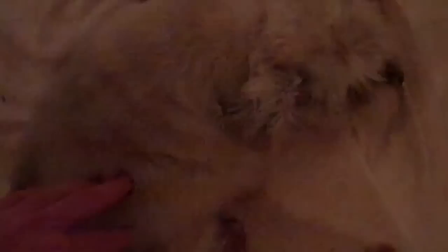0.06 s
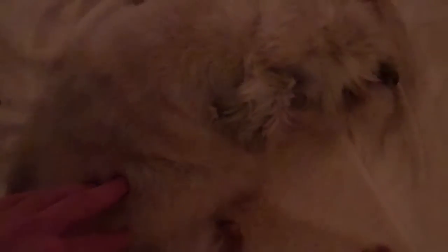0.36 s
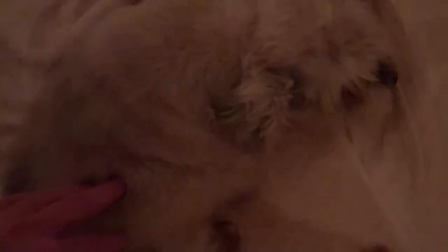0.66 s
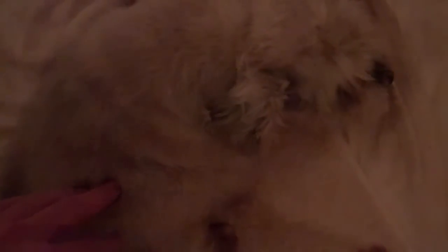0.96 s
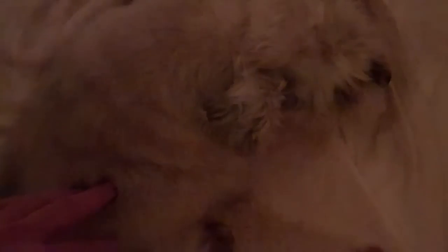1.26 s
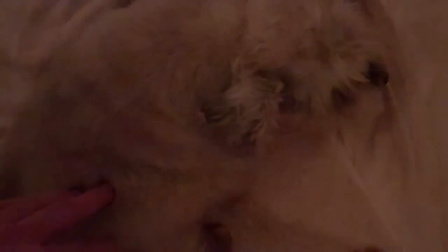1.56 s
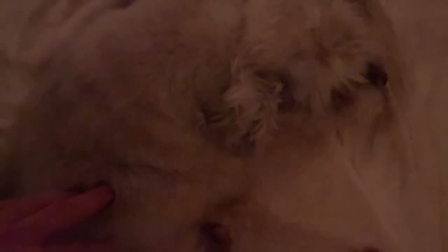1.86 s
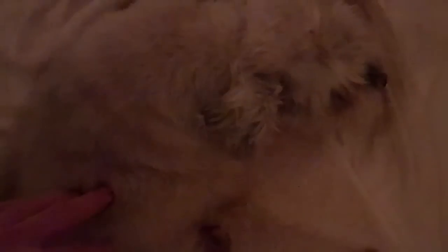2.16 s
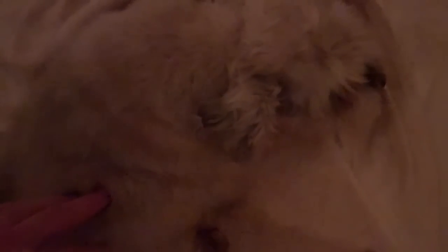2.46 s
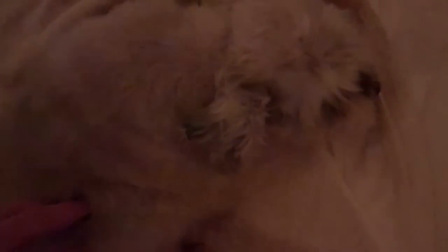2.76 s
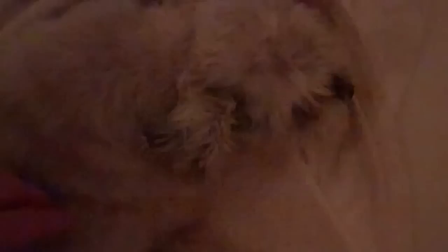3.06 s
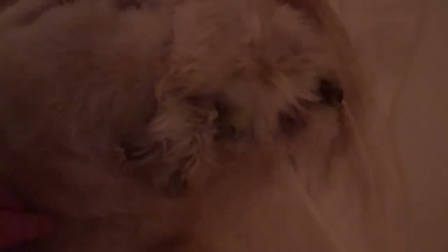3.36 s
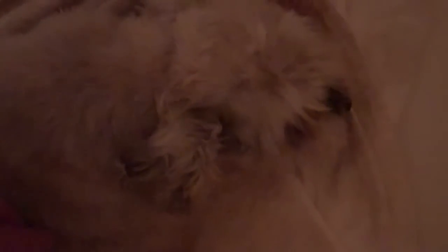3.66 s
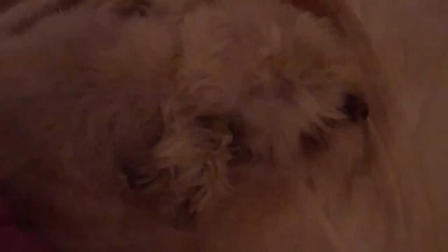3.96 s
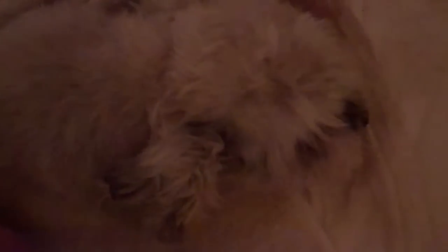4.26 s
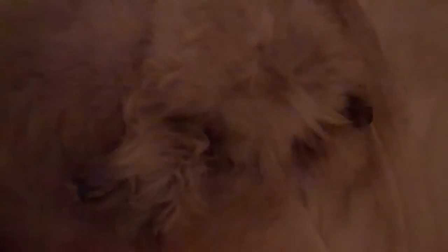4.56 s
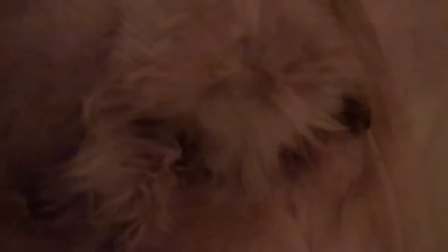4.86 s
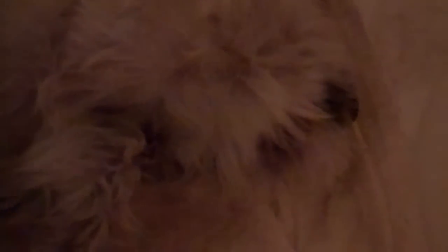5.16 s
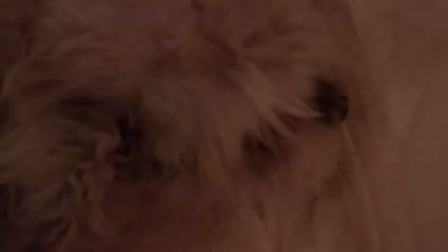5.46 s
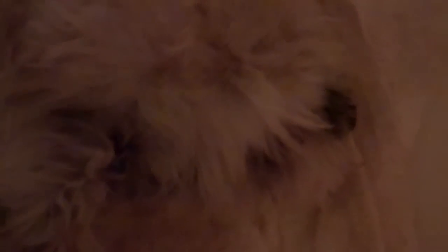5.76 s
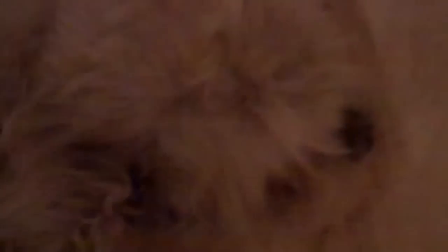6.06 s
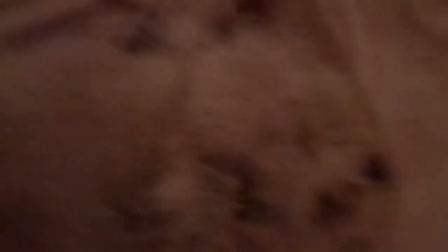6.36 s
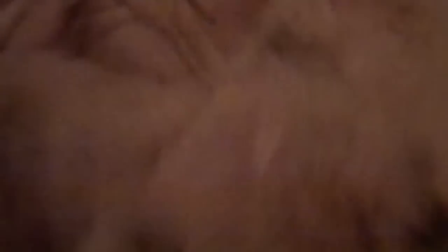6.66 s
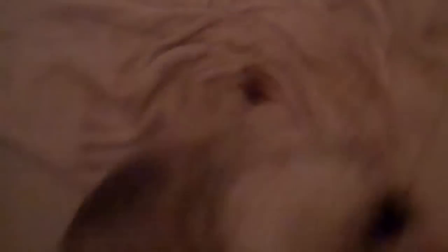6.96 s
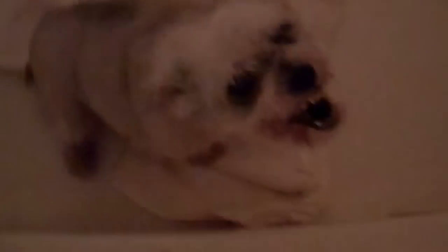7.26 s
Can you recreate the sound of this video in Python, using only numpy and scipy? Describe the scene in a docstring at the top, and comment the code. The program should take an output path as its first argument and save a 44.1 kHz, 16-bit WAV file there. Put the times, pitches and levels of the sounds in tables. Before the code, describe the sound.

A small dog growls close to the microphone in a small, quiet room with faint background hum and hiss. From the start the growl is low, rough and throbbing, made with the mouth shut, with soft wet lip clicks in the first second and a half. It eases around 2 seconds, then grows louder and more open from 3 seconds. Near 4.7 seconds the lips smack and the pitch climbs into a bright, warbling snarl that hisses through the teeth. At 6 seconds the dog snorts in air with a snore-like rattle, ending in a thin, falling nose whistle. At 6.7 seconds comes one long, cracking bark, the loudest sound, wavering in pitch and slightly overloading the microphone for about half a second. The teeth snap at about 7.2 seconds, and a short, raspy breath in follows with one more click.

```python
"""Indoors, in a small furnished room, a stereo microphone close to a small old dog that is being stroked.
It growls with its mouth shut, throat throbbing, lips clicking wetly. Near 3 s the lips part, and by 5 s
the growl has climbed to a toothy snarl. At 6 s it snorts in air, palate rattling, ending in a thin nose
whistle. At 6.7 s one long, cracking bark overloads the microphone; the teeth snap and it rasps in again."""
import sys
import numpy as np
from scipy import signal
from scipy.fft import rfft, irfft, next_fast_len
from scipy.io import wavfile
from scipy.ndimage import uniform_filter1d, map_coordinates

SR = 44100
rng = np.random.default_rng(int(sys.argv[2]) if len(sys.argv) > 2 else 0)


def generate_wav(sig):
    """Save sig (samples, or channels by samples) to the path in sys.argv[1] as 16-bit PCM at SR."""
    pcm = np.round(np.clip(np.atleast_2d(sig).T, -1, 1) * 32767).astype(np.int16)
    wavfile.write(sys.argv[1], SR, pcm)


N = 325899


def amp(db):
    return 10 ** (np.asarray(db) / 20)


def unit(x):
    return x / np.sqrt(np.mean(x ** 2) + 1e-20)


def along(points, hz):
    """Reads (f/Hz, value) points on a log frequency axis."""
    f, v = np.transpose(points)
    return np.interp(np.log(hz + 1), np.log(f + 1), v)


def curves(rows):
    """One value per sample for each column after the time."""
    times, *columns = np.transpose(rows)
    return [np.interp(np.arange(N) / SR, times, column) for column in columns]


def during(rows):
    """1 while a table lasts, with 10 ms fades outside it."""
    t = np.arange(N) / SR
    return np.clip(np.minimum(t - rows[0][0], rows[-1][0] - t) / .01 + 1, 0, 1)


def bumps(rows, half_s):
    """A smooth bump for each (t/s, height) row."""
    t = np.arange(N) / SR
    return sum(height * np.exp(-np.minimum(((t - s) / half_s) ** 2, 20)) for s, height in rows)


def wobble(rate, size=N):
    """A smooth random curve, rate knots a second."""
    knots = rng.standard_normal(int(size * rate / SR) + 4)
    fine = map_coordinates(knots, [np.arange(8 * len(knots)) / 8])
    return np.interp(np.arange(size) * (8 * rate / SR), np.arange(len(fine)), fine)


def phase_of(hz):
    return 2 * np.pi * np.cumsum(hz) / SR


def filtered(x, response):
    """x times a complex response of frequency."""
    size = next_fast_len(N + SR // 4)
    return irfft(rfft(x, size) * response(np.fft.rfftfreq(size, 1 / SR)), size)[..., :N]


def coloured(x, points, size=4096):
    """x through a causal filter with the given (f/Hz, gain/dB) points."""
    cepstrum = irfft(np.log(amp(along(points, np.fft.rfftfreq(size, 1 / SR)))))
    cepstrum[1:size // 2] *= 2
    cepstrum[size // 2 + 1:] = 0
    return signal.oaconvolve(x, irfft(np.exp(rfft(cepstrum))))[:N]


def steady(x, seconds):
    """x with its slow level held at rms 1."""
    size = max(int(seconds * SR), 2)
    power = uniform_filter1d(uniform_filter1d(x * x, size), size)
    return x / np.sqrt(np.abs(power) + 1e-9 * np.mean(x * x))


def resonance(x, centre_hz, width_hz, order=3):
    """A steep resonance whose centre follows a curve."""
    carrier = np.exp(1j * phase_of(centre_hz))
    lowpass = signal.butter(order, width_hz / 2, fs=SR, output="sos")
    return np.real(carrier * signal.sosfilt(lowpass, x / carrier))


# the quiet room: f/Hz, gain/dB
ROOM_TONE = [(25, -33), (60, -4.5), (130, -12), (400, -18), (2500, -19), (14000, -21)]
def room_tone():
    """Steady noise, strongest in the bass, different in each channel."""
    return np.array([unit(coloured(rng.standard_normal(N), ROOM_TONE)) for side in range(2)])


# the fluttering throat: t/s, throb rate/Hz
THROB_RATE = [(0.0, 28.61), (0.6, 25.73), (1.2, 24.18), (1.3, 22.78), (1.4, 25.16), (1.5, 23.1),
              (1.9, 22.74), (2.0, 24.78), (2.1, 21.35), (2.2, 23.51), (2.5, 21.51), (2.8, 22.59),
              (2.9, 25.66), (3.1, 23.25), (3.2, 25.77), (3.4, 21.63), (3.8, 23.38), (4.0, 15.49),
              (4.1, 21.71), (5.0, 22.88), (5.1, 15.72), (5.5, 25.02), (5.6, 22.02), (6.0, 22.97)]
def throbbing(parted, lift_db=0.84, uneven_db=0.78):
    """The throat flutters unevenly; once the lips part, every second throb swells."""
    rate, = curves(THROB_RATE)
    turn = phase_of(rate)
    flutter = np.cos(turn + np.cos(turn) / 2)
    every_second = (1 - np.cos(turn / 2)) ** 2 / 4
    height_db = lift_db * (1 + .5 * wobble(10))
    swell_db = height_db * every_second * parted + uneven_db * wobble(25)
    return flutter, swell_db


def closures(pitch, rough, jitter, shimmer_db, breath):
    """Vibrating tissue shuts once a cycle; roughness scatters the pulses and adds puffs of air."""
    cycles = np.cumsum(pitch) / SR
    at = np.interp(np.arange(1, int(cycles[-1])), cycles, np.arange(N))
    index = at.astype(int)
    late, size = rng.standard_normal((len(at), 2)).T
    at = np.clip(at + late * jitter * rough[index] * SR / pitch[index], 0, N - 2)
    size = amp(size * shimmer_db * rough[index])
    whole, part = at.astype(int), at % 1
    pulses = np.bincount(whole, size * (1 - part), N) + np.bincount(whole + 1, size * part, N)
    puffs = rng.standard_normal(N) * np.exp(-4 * (cycles % 1))
    return unit(pulses) + breath * rough * unit(puffs)


# the growling larynx: t/s, pitch/Hz, roughness/0-1
GROWL_PITCH = [(0, 172.4, 0.9), (2.8, 172.1, 0.91), (3.3, 179.4, 0.98), (4.6, 190.5, 1.02),
               (4.85, 258.1, 0.68), (5.15, 282.8, 0.48), (5.35, 309.9, 0.43), (5.9, 322.8, .3),
               (5.985, 320.4, 0.12), (6.03, 256.8, 0.16), (6.1, 156.6, 0.39)]
# the snarl's clean tone breaks up: t/s, dip/dB
TONE_BREAKS = [(5.135, 8), (5.25, 14), (5.34, 8), (5.435, 17), (5.53, 8), (5.625, -6), (5.745, 8),
               (5.845, 12), (5.95, 2)]
def larynx(parted, bared, swell_db, warble, warble_bend=0.0063):
    """The vocal folds give rough pulses, and a clean fundamental for the snarl."""
    pitch, rough = curves(GROWL_PITCH)
    rough = np.clip(rough, 0, 1)
    # a swell lifts the pitch of the low rattle, but drags the tight snarl down
    bend = (.025 * (1 - parted) - .012 * bared) * swell_db
    bend = bend - warble_bend * warble + .13 * rough * wobble(50)
    rough = rough * amp(.5 * bared * swell_db)
    pulses = closures(pitch * np.exp(bend), rough, jitter=0.199, shimmer_db=3.0, breath=1.0)
    tone_hz = pitch * (1 - warble_bend * warble / 2 + wobble(40) / 100)
    tone = unit(np.sin(phase_of(tone_hz))) * amp(-bumps(TONE_BREAKS, half_s=0.013))
    return pulses, tone


# the growl's low colour, throat and small-room resonances together,
# with mouth shut, lips parted, teeth bared: f/Hz, gain/dB
LOW_SHUT = [(90, -31), (130, -30), (155, -3.5), (205, -14.5), (255, -19), (300, -21), (322, -0.5),
            (362, 2.5), (390, -14.5), (440, -3.5), (570, -18), (660, -14.5), (1000, -30), (1700, -49)]
LOW_PARTED = [(90, -35.5), (125, -21.5), (158, -11), (232, -2.5), (270, -19), (325, 4), (445, -2),
              (510, 6.5), (560, -6), (670, -6), (800, -20.5), (1000, -27), (1700, -48)]
LOW_BARED = [(100, -59), (235, -28), (290, 6), (330, 1), (390, -23), (470, -3), (540, 4), (640, -13),
             (720, -1), (900, -6.5), (1600, -43)]
def low_growl(pulses, tone, push, parted, bared):
    """The pulses ring throat and room modes together; the colour shifts as the lips open."""
    shut = steady(steady(coloured(pulses, LOW_SHUT), 0.012) * push ** 1.73, 0.15)
    ajar = steady(steady(coloured(pulses, LOW_PARTED), 0.021) * push ** 0.31, 0.17)
    snarl = steady(0.82 * bared ** 3 * tone + 0.5 * unit(coloured(pulses, LOW_BARED)), 0.098)
    rattle = np.sqrt(1 - parted) * shut + np.sqrt(parted * (1 - bared)) * ajar
    return rattle + np.sqrt(parted) * bared ** 2.5 * snarl


def mouth(pulses, push, parted, bared, mouth_hz):
    """One resonance of the mouth, sharpest when the lips just part."""
    wide = np.clip(0.5 * (1 - parted) + 1.515 * bared ** 0.96, 0, 1)
    sharp = steady(resonance(pulses, mouth_hz, width_hz=161), 0.09)
    broad = steady(resonance(pulses, mouth_hz, width_hz=350), 0.2)
    return steady(((1 - wide) * sharp + wide * broad) * push ** (1.1 - 0.19 * bared), 0.051)


# resonances of the open muzzle: f/Hz, width/Hz, level/dB
MUZZLE_MODES = [(1697, 210, -1.5), (2196, 310, 4.5), (2970, 670, 2.5), (3890, 370, 1)]
def muzzle(pulses, push, flutter):
    """Each throb lifts and rattles the resonances of the muzzle."""
    rattle = pulses * amp(1.8 * wobble(200) + 0.74 * flutter)
    buzz = 0
    for hz, width_hz, db in MUZZLE_MODES:
        centre_hz = hz * (1 + 0.022 * (flutter + wobble(20)))
        buzz = buzz + amp(db) * unit(resonance(rattle, centre_hz, width_hz, order=2))
    return steady(buzz * push, 0.44)


def sinking_hiss(colour, at_s, sink_per_s):
    """Hiss that slides down as the lips draw back, passing through the given colour at at_s."""
    speed = np.exp(np.clip(sink_per_s * (at_s - np.arange(N) / SR), -.2, .2))
    hiss = coloured(rng.standard_normal(N), colour)
    return unit(map_coordinates(hiss, [np.cumsum(speed)], mode="wrap"))


# air through the nose, between parted lips, past bared teeth: f/Hz, gain/dB
NOSE_AIR = [(2000, -22.5), (3700, -7.5), (4400, 7), (5400, -9.5), (6800, 2), (8000, -11.5), (9400, -3.5),
            (11000, -11), (14000, -3.5)]
LIP_AIR = [(1900, -8), (3030, 3.5), (3480, -7), (4150, 9), (4750, 3.5), (5350, -15), (5900, -3.5),
           (6800, 9), (7300, 0.5), (12400, -4), (14300, 4)]
TEETH_AIR = [(3000, -21), (4100, 0), (4750, -1), (5400, 9), (6200, 1.5), (6850, -5), (7400, 0.5),
             (8150, -8), (9200, -6), (11500, -6), (12200, -5), (14000, -12)]
def exhale(pulses, flutter, parted, bared, spit_db=0.5):
    """Each throb pushes out a hiss; half-drawn lips flap wetly and add to it."""
    nose = unit(coloured(rng.standard_normal(N) + 0.32 * pulses, NOSE_AIR))
    lips = sinking_hiss(LIP_AIR, at_s=3.4, sink_per_s=0.032)
    teeth = sinking_hiss(TEETH_AIR, at_s=5.8, sink_per_s=0.13)
    hiss = np.sqrt(1 - parted) * nose + np.sqrt(parted * (1 - bared)) * lips + bared * teeth
    flicker_db = (6.5 - 3.7 * bared) * flutter + wobble(40) + (4.0 - 0.69 * parted) * wobble(250)
    return amp(spit_db * np.sin(np.pi * bared) ** 2) * steady(hiss * amp(flicker_db), 0.051)


# the lips part, then draw back: t/s, parted/0-1, bared/0-1, mouth resonance/Hz
LIP_POSE = [(0, 0.05, 0, 1350), (2.8, 0.04, 0.02, 1444), (3.2, 0.94, 0.04, 1313), (3.9, 0.99, 0.14, 1265),
            (4.66, 0.98, 0.12, 1204), (4.8, 1, .66, 1106), (5.25, 0.98, 0.98, 1080),
            (6.1, 0.94, 0.81, 1034)]
# how hard the dog pushes: t/s, level/dB
GROWL_EFFORT = [(0, -85), (.035, -45), (.25, -33), (.8, -30), (1.35, -30.5), (1.8, -36), (2.68, -39.5),
                (3.03, -33.5), (3.2, -25.5), (3.85, -22.5), (4.6, -23), (5.1, -22), (5.4, -22),
                (5.99, -20.5), (6.03, -33), (6.1, -23.5)]
# the dog heaves: t/s, swell/dB
GROWL_HEAVES = [(.07, 5), (.26, 2), (.507, 4.5), (.668, 1), (.8, 3.5), (1.055, 1), (1.305, 4), (1.483, 3),
                (1.567, 4), (1.648, 2.5), (1.86, 4), (1.96, 4), (2.045, 3), (2.135, 2.5), (2.39, 3.5),
                (2.49, 5), (2.89, 0.5), (3.41, 4.5), (3.85, 4.5), (3.99, 2), (4.49, 3), (4.83, 5),
                (4.97, 3.5), (5.045, 3.5)]
# the voice catches: t/s, dip/dB
GROWL_CATCHES = [(.345, 9), (.61, 9), (.765, 5), (.85, 6), (.94, 7), (1.345, 2), (1.71, 10), (1.9, 7),
                 (2.33, 7), (2.66, 11), (3.075, 4.5), (3.155, 6), (4.538, 5), (4.615, 13), (4.792, 4.5),
                 (4.92, 4), (5.012, 10)]
# layers over the low growl: level when shut/dB, added when parted/dB, added when bared/dB
MOUTH_MIX = (-23.5, 13.5, 15)
MUZZLE_MIX = (-36, 3, 25.5)
EXHALE_MIX = (-16.5, -7.5, 2.5)
def growl(warble_hz=15, warble_db=1.5):
    """The larynx drives the low growl, mouth and muzzle; bared teeth make a bright, warbling snarl."""
    parted, bared, mouth_hz = curves(LIP_POSE)
    parted, bared = np.clip([parted, bared], 0, 1)
    flutter, swell_db = throbbing(parted)
    warble = bared ** 2 * np.cos(phase_of(warble_hz * (1 + 0.1178 * wobble(8))))
    pulses, tone = larynx(parted, bared, swell_db, warble)
    throb_db = (1.5 + 2.0 * np.sin(np.pi * bared)) * flutter + warble_db * warble
    push = amp(throb_db + (1.5 - .5 * bared) * swell_db + 1.9 * parted * wobble(60))

    def opened(shut_db, parted_db, bared_db):
        return amp(shut_db + parted_db * parted + bared_db * bared)

    voice = low_growl(pulses, tone, push, parted, bared)
    voice += opened(*MOUTH_MIX) * mouth(pulses, push, parted, bared, mouth_hz)
    voice += opened(*MUZZLE_MIX) * muzzle(pulses, push, flutter)
    voice += opened(*EXHALE_MIX) * exhale(pulses, flutter, parted, bared)
    effort_db, = curves(GROWL_EFFORT)
    accent_db = bumps(GROWL_HEAVES, half_s=0.019) - bumps(GROWL_CATCHES, half_s=0.012)
    return amp(effort_db - 1 + accent_db) * voice * during(GROWL_EFFORT)


def ticks(rows, colour, t60, attack_s=0.00027):
    """A burst of noise for each (t/s, level/dB) row, dying by 60 dB in t60 seconds."""
    t = np.arange(SR // 8) / SR
    strikes = np.bincount([int(s * SR) for s, db in rows], [amp(db) for s, db in rows], N)
    burst = amp(-60 * t / t60) * (1 - np.exp(-t / attack_s))
    return signal.oaconvolve(strikes, burst)[:N] * unit(coloured(rng.standard_normal(N), colour))


# wet clicks: t/s, level/dB; their colour: f/Hz, gain/dB
WET_CLICKS = [(0.5816, -23), (0.6592, -27.5), (0.7436, -21.5), (0.7823, -24), (0.9028, -18.5),
              (0.9756, -22), (1.0226, -24.5), (1.4745, -22.5), (3.557, -21)]
CLICK_COLOUR = [(1700, -33), (3000, -25), (4400, 12), (5400, -3.5), (6700, 9), (8500, 1.5), (14000, -5)]
def wet_clicks():
    """Wet lips and teeth click, high and soft-edged."""
    return ticks(WET_CLICKS, CLICK_COLOUR, t60=0.026, attack_s=0.0054)


# lip smacks: t/s, level/dB; their colour: f/Hz, gain/dB
LIP_SMACKS = [(4.727, -28.5), (4.76, -17), (4.807, -19.5), (4.985, -24)]
SMACK_COLOUR = [(1000, -16), (3000, 4.5), (4700, -4), (5700, 6), (7000, -3), (14000, -18)]
def lip_smacks():
    """The lips smack off the teeth as they draw back."""
    return ticks(LIP_SMACKS, SMACK_COLOUR, t60=0.017)


# palate slaps: t/s, level/dB; their colour: f/Hz, gain/dB
PALATE_SLAPS = [(5.377, -10), (5.55, -14), (6.123, -6.5), (6.225, -12), (6.335, -16), (6.381, -10)]
SLAP_COLOUR = [(300, -26), (800, -14), (1100, 3.5), (1300, -4), (1650, -30.5), (14000, -39)]
def palate_slaps():
    """The soft palate slaps and rings the mouth."""
    return ticks(PALATE_SLAPS, SLAP_COLOUR, t60=0.032, attack_s=0.0014)


# the snore of indrawn air: f/Hz, gain/dB
SNORE_COLOUR = [(100, -28), (320, -7.5), (530, -2.5), (660, -3.5), (760, -6.5), (1050, -1.5), (1400, -13),
                (2000, -42.5)]
def inhale(rows, hiss_colour, rattle_hz, breath):
    """Air dragged in rattles the soft palate, rings the mouth and hisses past the teeth."""
    snore_db, hiss_db, mouth_hz = curves(rows)
    pitch = rattle_hz * np.exp(.2 * wobble(18))
    rattle = closures(pitch, np.ones(N), jitter=0.18, shimmer_db=-1.5, breath=breath)
    rattle += 2.3 * rng.standard_normal(N)
    ring = steady(resonance(rattle, mouth_hz, width_hz=240), 0.026)
    snore = 0.49 * unit(coloured(rattle, SNORE_COLOUR)) + 0.95 * ring
    hiss = unit(coloured(rng.standard_normal(N) + 0.32 * rattle, hiss_colour))
    return (amp(snore_db) * snore + amp(hiss_db - 3.0) * hiss) * during(rows)


# the breath before the bark: t/s, snore/dB, hiss/dB, mouth resonance/Hz; its hiss: f/Hz, gain/dB
SNORT_BREATH = [(6.055, -54, -56, 1040), (6.075, -18, -29.5, 1030), (6.12, -17.5, -26.5, 1000),
                (6.2, -21.5, -32.5, 989), (6.38, -19, -32, 1000), (6.55, -22.5, -32, 1037),
                (6.59, -21.5, -25, 850), (6.64, -30, -34, 830), (6.69, -34.5, -42.5, 824)]
SNORT_AIR = [(940, -15), (1600, -1.5), (1920, 2), (2570, 2.5), (2980, -12), (3740, 6), (4370, -4.5),
             (5010, 1.5), (7080, -6.5), (9400, -5), (11300, -12), (13200, 0), (14200, -12)]
def snort():
    """A long breath in, more snore than hiss."""
    return inhale(SNORT_BREATH, SNORT_AIR, rattle_hz=97.6, breath=2.5)


# jaw snaps: t/s, level/dB; their colour: f/Hz, gain/dB
JAW_SNAPS = [(6.11, -32), (6.697, -12), (7.249, -6.5), (7.381, -17.5)]
SNAP_COLOUR = [(150, -15), (330, 5), (600, -8), (1900, 3), (3300, 6), (5500, -10), (14000, -19)]
def jaw_snaps():
    """Lips smack and jaws clack around the bark."""
    return ticks(JAW_SNAPS, SNAP_COLOUR, t60=0.021)


# the thin end of the snort: t/s, f/Hz, level/dB
NOSE_WHISTLE = [(6.49, 2600, -46), (6.56, 2590, -31.5), (6.61, 2350, -33.5), (6.66, 2470, -44)]
def nose_whistle():
    """Air drawn through the nose sings in a narrow, falling band."""
    pitch, level_db = curves(NOSE_WHISTLE)
    band = unit(resonance(rng.standard_normal(N), pitch, width_hz=160))
    return amp(level_db) * band * during(NOSE_WHISTLE)


# the barking voice: t/s, pitch/Hz, level/dB, strain/0-1
BARK_VOICE = [(6.697, 330, -15, 0.8), (6.714, 451.3, -15.5, .3), (6.734, 569, -2.5, 0.18),
              (6.754, 682.6, -8, 0.14), (6.773, 701.7, -4, 0), (6.8, 521, -6.5, 0.48),
              (6.812, 529.7, -5.5, 0.53), (6.845, 549.3, -3.5, .5), (6.877, 588.3, 2, 0.06),
              (6.899, 713.5, -3, 0.24), (6.915, 717.4, -6, 0.33), (6.933, 565.8, -3, 0.05),
              (6.97, 474.7, -12.5, 0.36), (7.01, 503.6, -4.5, 0.82), (7.042, 399.5, -16.5, 0.24),
              (7.083, 519, -12.5, 0.15), (7.108, 460.7, -15, 0.19), (7.13, 313.4, -25, 0.05),
              (7.175, 299.7, -17, 0.93), (7.245, 238.5, -28, 0.62)]
# the wide-open throat: f/Hz, gain/dB
THROAT_WIDE = [(150, -21.5), (330, -9.5), (500, -5.5), (620, -13), (700, 3), (820, -9), (980, 0), (1150, 5),
               (1420, -4.5), (1720, -2), (2140, 2.5), (2480, -2.5), (2900, -4.5), (3700, -10.5),
               (5500, -20.5), (9000, -20), (14000, -22.5)]
def bark(harmonics=7, attack_s=0.0032, release_s=0.025, tear_db=3):
    """A gliding stack of harmonics through the open throat; strain makes it both rough and bright."""
    start, end = int(BARK_VOICE[0][0] * SR), int((BARK_VOICE[-1][0] + release_s) * SR)
    pitch, level_db, strain = np.array(curves(BARK_VOICE))[:, start:end]
    size, rough = end - start, np.clip(strain, .02, 1)
    bright_db = 15.5 + 6.5 * np.log2(rough) + 0.71 * level_db
    phase = phase_of(pitch * (1 + (.005 + .012 * rough) * wobble(140, size)))
    phase += .3 * rough * wobble(450, size)

    def pressed(hz):  # pressing harder lifts the resonances around 2-3 kHz
        return np.interp(hz, [1110, 2020, 3180, 5400], [0, 1, 1, 0])

    def partial(k):
        db = along(THROAT_WIDE, k * pitch) + bright_db * pressed(k * pitch)
        return amp(db + 4.5 * wobble(70.2, size)) * np.sin(k * phase)

    stack = sum(partial(k) for k in range(1, harmonics + 1))
    # alternate cycles grow unequal, which adds partials halfway between the harmonics
    stack += 0.35 * np.sqrt(rough) * sum(partial(k + .5) for k in range(2, harmonics))
    air = coloured(rng.standard_normal(size) * (1 + 0.15 * np.cos(phase)), THROAT_WIDE)[:size]
    pressed_air = irfft(rfft(air) * pressed(np.fft.rfftfreq(size, 1 / SR)), size)
    air += (amp(bright_db) - 1) * pressed_air
    voice = np.sqrt(1 - rough) * steady(stack, 0.026) + .65 * np.sqrt(rough) * steady(air, 0.0085)
    t = np.arange(size) / SR
    envelope = np.clip(np.minimum(t / attack_s, (t[-1] - t) / release_s), 0, 1)
    shake_db = tear_db * rough * wobble(172.4, size)
    return np.pad(envelope * amp(level_db + shake_db) * voice, (start, N - end))


# the breath after the bark: t/s, snore/dB, hiss/dB, mouth resonance/Hz; its hiss: f/Hz, gain/dB
RASP_BREATH = [(7.23, -41, -25, 1001), (7.25, -41, -22, 1035), (7.33, -25, -17.5, 1020),
               (7.39, -27.5, -21.5, 1080)]
RASP_AIR = [(710, -16.5), (1200, -7), (1420, -3.5), (1760, -0.5), (2070, -8.5), (4690, -6.5), (8370, -19),
            (14200, -15)]
def rasp():
    """A short breath in, more hiss than snore."""
    return inhale(RASP_BREATH, RASP_AIR, rattle_hz=123.0, breath=2.0)


# the room's decay: f/Hz, t60/s
ROOM_DECAY = [(150, 0.51), (500, 0.18), (2000, 0.19), (12000, 0.071)]
# its reflections at the microphone: f/Hz, gain/dB
ROOM_GAIN = [(200, -18), (700, -16), (1200, -4), (3000, -4.5), (6000, -8.5), (14000, 4.5)]
def room(dog):
    """The small furnished room answers each side of the microphone differently, about 2 ms late."""
    hz, t, noise = signal.stft(rng.standard_normal((2, SR // 3)), SR, nperseg=256)
    t60 = along(ROOM_DECAY, hz)[:, None]
    decaying = noise * amp(-60 * t / t60 + along(ROOM_GAIN, hz)[:, None])
    equal_energy = np.sqrt(2 * np.log(1000) / (t60 * SR))
    tail = signal.istft(decaying * equal_energy, SR, nperseg=256)[1]
    return signal.fftconvolve(np.pad(dog, (90, 0))[None], tail, axes=1)[:, :N]


# balance at the microphone: f/Hz, left over right/dB
STEREO_BALANCE = [(300, 0.5), (1000, 0), (2500, 3.5), (5000, 0.5), (9000, 3.5), (13000, 8.5)]
def stereo_pair(x, lag_s=.00003):
    """The left side hears the dog a little louder and later."""
    def response(hz):
        log_ratio = np.log(amp(along(STEREO_BALANCE, hz))) - 2j * np.pi * hz * lag_s
        return np.exp(np.outer([.5, -.5], log_ratio))
    return filtered(x, response)


def scene():
    """The dog at close range, the room around it, and faint room tone behind."""
    dog = growl() + wet_clicks() + lip_smacks() + palate_slaps()
    dog += snort() + amp(-0.5) * jaw_snaps() + nose_whistle() + bark() + rasp()
    return stereo_pair(dog + room(dog)) + amp(-56.0) * room_tone()


def record(dry, ceiling=0.9, hardness=5, skew=0.16, low_hz=36, top_hz=14300):
    """The overloaded microphone flattens peaks, positive ones sooner; rumble and top treble are cut."""
    drive = np.abs(dry * (1 + skew * np.sign(dry)) / ceiling)
    flattened = dry / (1 + drive ** hardness) ** (1 / hardness)
    return filtered(flattened, lambda hz: (hz < top_hz) * hz ** 2 / np.hypot(hz ** 2, low_hz ** 2))


dry = scene()
out = record(dry)
generate_wav(out)
```